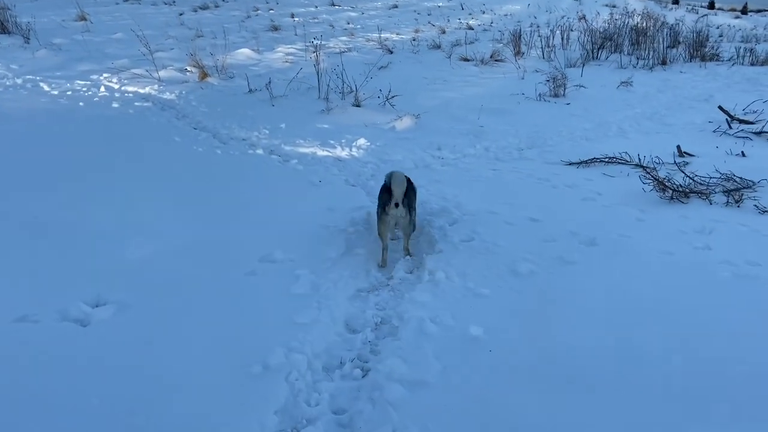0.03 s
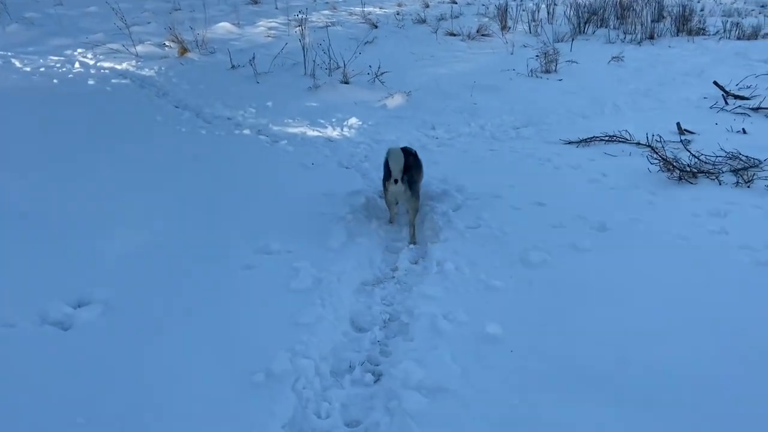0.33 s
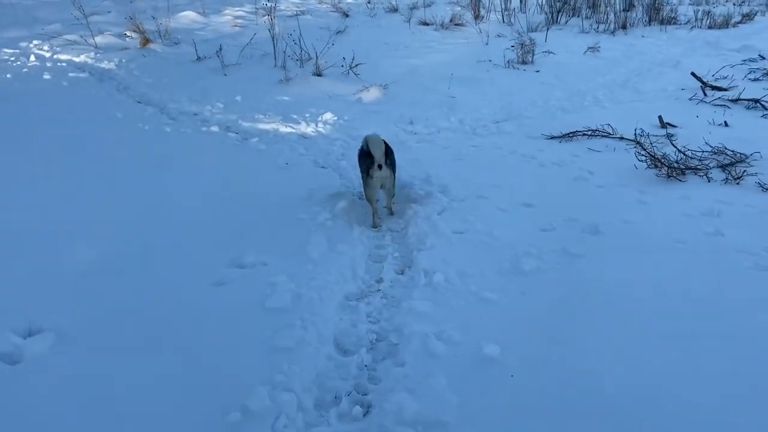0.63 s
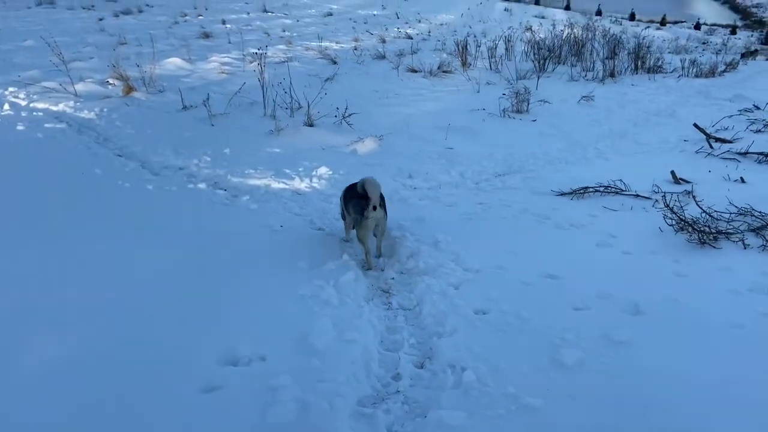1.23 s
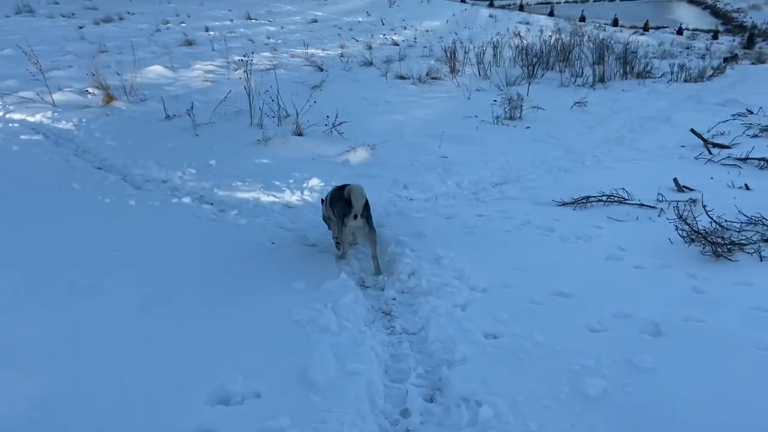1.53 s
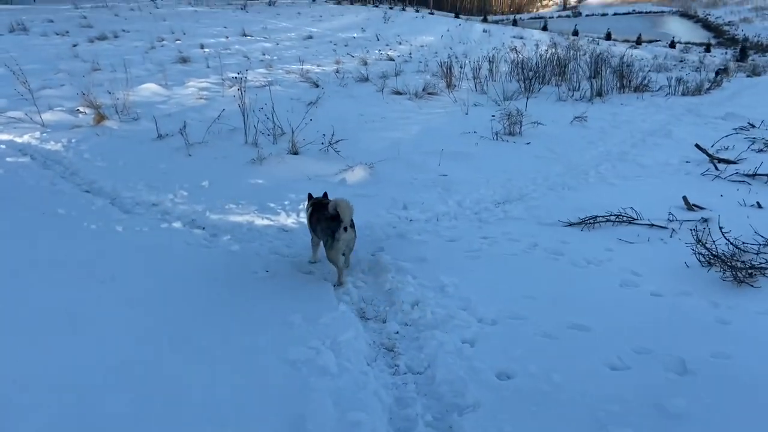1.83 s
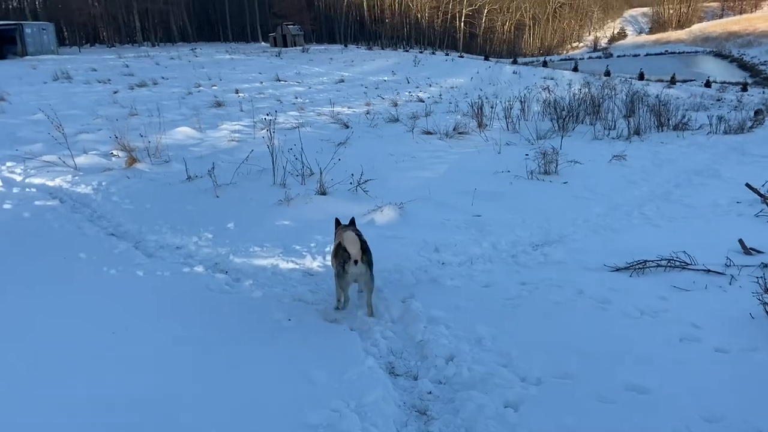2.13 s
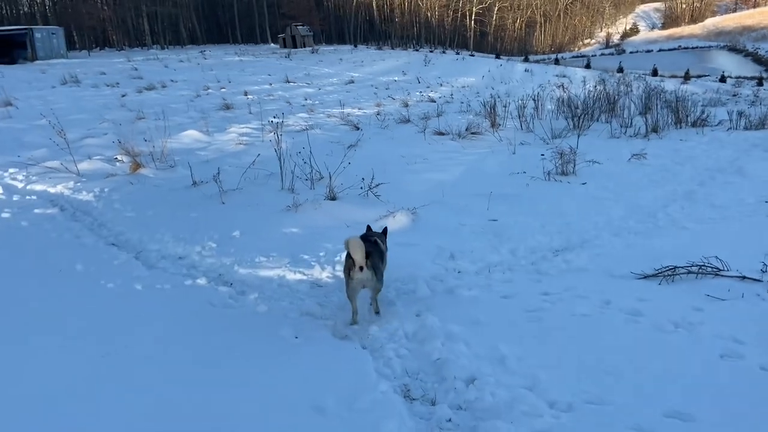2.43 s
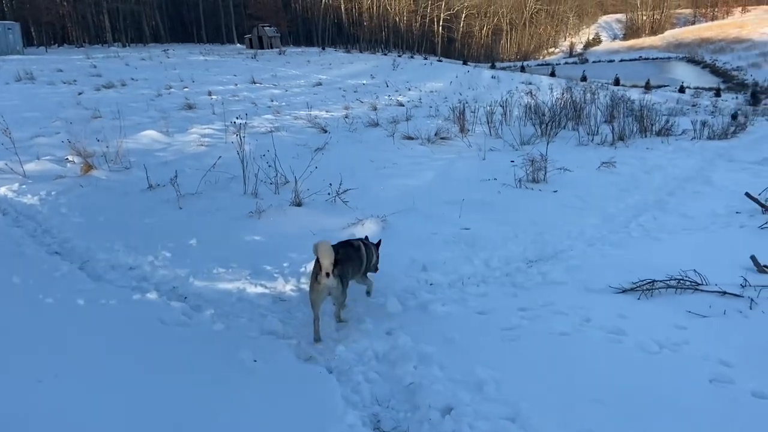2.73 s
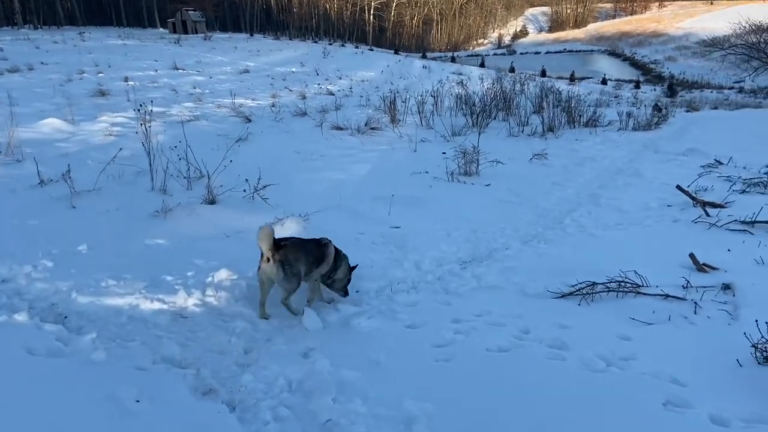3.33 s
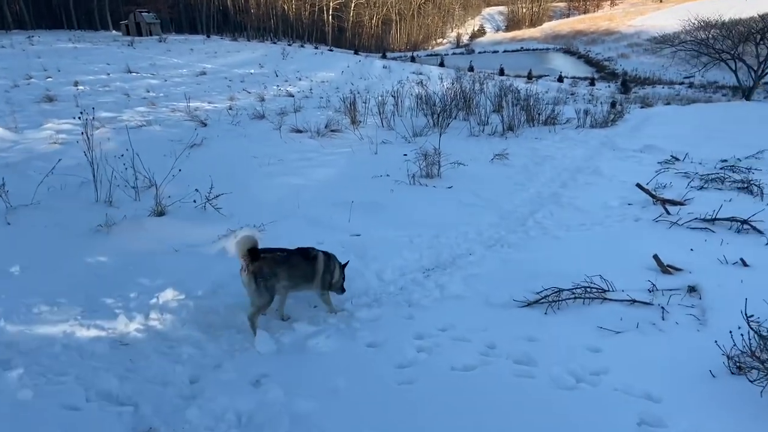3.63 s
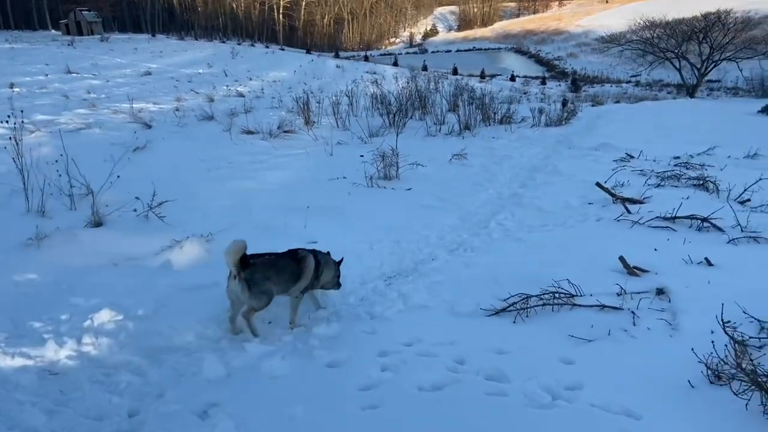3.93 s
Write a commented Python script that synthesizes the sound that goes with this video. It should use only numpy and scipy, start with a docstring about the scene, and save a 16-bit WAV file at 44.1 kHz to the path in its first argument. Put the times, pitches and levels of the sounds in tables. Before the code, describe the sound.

Footsteps crunch steadily through crusted snow, close by, over a light wind rumble.

```python
"""Footsteps crunch through crusted snow, about one every 0.6 s, close to a hand-held phone in an open field.
Each push of a boot packs the snow (low knocks), breaks the crust (crackle) and sprays icy powder (hiss),
all in small jerks. Plates of crust snap under and between the steps, slabs cave in, ice ticks and
skitters, and the snowpack groans under the weight. Light wind rumbles on the microphone. No echo."""
import sys
import numpy as np
from scipy import signal
from scipy.fft import rfft, irfft
from scipy.io import wavfile
from scipy.ndimage import uniform_filter1d

SR = 44100
rng = np.random.default_rng(int(sys.argv[2]) if len(sys.argv) > 2 else 0)


def unload_wav(signal):
    """Save mono or channel-first audio to the path in sys.argv[1] as 16-bit WAV at rate SR, clipped to [-1, 1]."""
    wavfile.write(
        sys.argv[1],
        SR,
        np.round(np.clip(np.atleast_2d(signal).T, -1, 1) * 32767).astype(np.int16),
    )


N = 176400

PACKING, CRUST, POWDER, GROAN = range(4)  # the layers, in the order of their level columns
# A boot pushing or dragging through snow. Each row: start, rise and hold in seconds, seconds to fall
# 20 dB, then packing, crust, powder and groan levels in dB before trim.
BOOT_PUSHES = [ (-.02, .02, .06, .04, -37, -52, -58, -42), (.075, .02, .14, .17, -33.5, -39.5, -51, -35),
               (.545, .01, .035, .05, -34, -46, -56, -32), (.598, .015, .06, .09, -36, -39, -44, -33),
               (.708, .02, .065, .09, -33.5, -39.5, -48, -33), (.950, .008, .02, .12, -48, -62, -65, -42),
               (1.160, .01, .08, .05, -44, -55, -64, -48), (1.266, .002, .035, .19, -33, -35, -51, -39),
               (1.325, .05, .035, .1, -32, -39, -49, -41), (1.480, .01, .14, .05, -41, -59, -68, -45),
               (1.655, .01, .08, .05, -45, -53, -58, -49), (1.795, .004, .045, .1, -42, -48, -54, -42),
               (1.850, .02, .035, .05, -39, -43, -50, -42), (1.915, .015, .02, .08, -33, -34, -40, -37),
               (1.950, .02, .09, .1, -38, -37.5, -44, -41), (2.115, .025, .05, .14, -35, -46, -56, -39),
               (2.385, .04, .08, .1, -41, -50, -57, -43), (2.490, .04, .17, .09, -38.5, -41.5, -51, -41),
               (2.790, .02, .2, .05, -50, -58, -64, -50), (3.025, .03, .05, .1, -43, -46, -54, -42),
               (3.075, .05, .08, .15, -36.5, -44.5, -48, -35), (3.230, .05, .09, .11, -32, -39.5, -53, -36),
               (3.683, .01, .04, .03, -43, -56, -69, -47), (3.735, .012, .008, .05, -35, -35, -44, -40),
               (3.765, .02, .13, .05, -39, -44, -52, -43), (3.890, .04, .1, .1, -33, -42, -47, -36)]
# Snow settling under the standing foot: packing, crust, powder and groan levels in dB before trim.
SETTLING_DB = (-56, -68, -78, -60)
# Plates of crust snapping. Each row: time in seconds, then packing, crust and powder targets in dB.
CRUST_SNAPS = [(.049, -33, -36, -48), (.079, -29, -31, -47), (.106, -32, -36, -47), (.117, -29, -33, -47),
               (.143, -29, -37, -50), (.187, -24, -31, -45), (.198, -27, -36, -47), (.213, -26, -33, -47),
               (.234, -29, -37, -49), (.274, -29, -41, -53), (.304, -36, -44, -54), (.329, -36, -41, -50),
               (.357, -32, -40, -48), (.385, -37, -47, -55), (.404, -35, -50, -60), (.429, -36, -48, -57),
               (.457, -33, -46, -57), (.553, -32, -39, -48), (.569, -32, -39, -43), (.623, -28, -34, -41),
               (.662, -29, -34, -42), (.732, -26, -35, -44), (.747, -29, -35, -45), (.756, -28, -36, -43),
               (.779, -29, -36, -46), (.811, -29, -35, -44), (.839, -33, -39, -45), (.846, -31, -35, -45),
               (.877, -31, -38, -52), (1.028, -44, -51, -59), (1.125, -38, -37, -49),
               (1.173, -32, -39, -48), (1.233, -38, -51, -56), (1.267, -31, -28, -43),
               (1.291, -26, -31, -46), (1.354, -29, -35, -47), (1.387, -27, -34, -46),
               (1.399, -25, -33, -45), (1.408, -27, -30, -42), (1.455, -33, -37, -49),
               (1.487, -34, -39, -50), (1.516, -35, -46, -52), (1.564, -34, -47, -55),
               (1.592, -33, -44, -53), (1.629, -32, -48, -57), (1.662, -34, -35, -47),
               (1.694, -35, -38, -45), (1.74, -36, -45, -55), (1.786, -36, -38, -47), (1.82, -37, -35, -38),
               (1.887, -32, -35, -43), (1.933, -29, -26, -33), (2.056, -30, -35, -43),
               (2.138, -30, -43, -53), (2.176, -29, -40, -50), (2.309, -40, -53, -58),
               (2.358, -36, -48, -51), (2.379, -39, -48, -56), (2.403, -34, -39, -51),
               (2.434, -30, -39, -51), (2.464, -32, -43, -52), (2.54, -32, -35, -48), (2.57, -33, -35, -47),
               (2.618, -31, -35, -46), (2.642, -33, -33, -47), (2.68, -34, -36, -44),
               (2.722, -35, -36, -47), (2.745, -33, -32, -42), (2.756, -32, -34, -45),
               (2.794, -37, -47, -53), (2.824, -35, -45, -51), (2.861, -38, -47, -55),
               (2.897, -42, -39, -50), (2.938, -40, -48, -54), (2.978, -38, -46, -55),
               (3.002, -37, -43, -51), (3.056, -36, -34, -49), (3.227, -30, -38, -49),
               (3.281, -25, -30, -49), (3.298, -28, -33, -48), (3.308, -28, -37, -49),
               (3.404, -33, -36, -54), (3.439, -32, -36, -52), (3.746, -32, -27, -40),
               (3.769, -36, -34, -45), (3.88, -29, -38, -48), (3.944, -30, -36, -43),
               (3.968, -30, -37, -43), (3.988, -23, -35, -45)]
# Allowance for the quiet bed, taken out of each snap's target: packing, crust and powder in dB.
SNAP_BED_DB = (-40, -58, -70)
# The tone of each snow layer. Each row: frequency in Hz, relative gain in dB.
PACKING_EQ = [(60, -13), (120, -7), (190, 1), (260, -.5), (330, 1), (450, .5), (650, .3), (900, -8),
              (1400, -21), (3000, -45), (16000, -70)]
CRUST_EQ = [(100, -35), (500, -12), (900, -.5), (1200, -.5), (1600, -4), (2100, -2), (3000, -8.5),
            (4200, -17), (6000, -30), (16000, -45)]
POWDER_EQ = [(200, -35), (1500, -13), (3000, -1), (4300, 3), (5600, -2), (7500, -2.5), (9000, -5.5),
             (11500, -4), (13500, -8.5), (16000, -8)]
GROAN_EQ = [(40, -25), (85, -2), (125, -5), (185, 1), (240, -1), (330, -7), (500, -22), (2000, -60)]
# The feel of each grain layer. Each lists: grains per second, size scatter, push trim and snap trim in dB,
# snap rise and decay in seconds, stereo width from 0 to 1, left minus right in dB.
PACKING_TEXTURE = (1100, 2.8, .4, -1.3, .001, .003, .22, .6)
CRUST_TEXTURE = (2400, 3.3, .1, -3.2, .0012, .0027, .24, -1.1)
POWDER_TEXTURE = (5500, 3.6, 1.8, .4, .002, .0028, .38, .8)
# The hollow under the sole ringing. Each row: start and length in seconds, first and last pitch in Hz,
# level in dB.
SOLE_HOLLOWS = [(.1, .06, 950, 700, -37), (.178, .07, 440, 560, -31), (.61, .07, 400, 340, -39),
                (.725, .11, 360, 260, -33), (1.28, .095, 600, 500, -31), (1.38, .055, 700, 470, -29),
                (1.89, .17, 800, 600, -39), (2.14, .06, 600, 480, -39), (2.52, .2, 850, 620, -42),
                (3.27, .11, 640, 440, -33), (3.93, .09, 460, 380, -35)]
# Slabs caving in, thin ice ticking, body weight landing. Each row: start in seconds, pitch in Hz, peak in dB.
SLAB_KNOCKS = [(.118, 900, -26), (.188, 580, -20), (.213, 600, -24), (.878, 950, -25), (1.267, 950, -19),
               (1.271, 800, -23), (1.292, 800, -17), (1.387, 720, -20), (1.399, 650, -18),
               (1.888, 950, -24), (1.934, 850, -22), (2.619, 800, -24), (3.282, 750, -18)]
ICE_TICKS = [(.08, 2300, -28), (.812, 2200, -29), (.841, 2200, -30), (1.124, 1100, -33), (1.266, 3000, -26),
             (1.27, 2200, -26), (1.409, 2100, -25), (1.663, 3100, -30), (1.665, 2000, -32),
             (1.695, 3200, -34), (1.697, 1050, -32), (1.82, 2200, -25), (1.93, 2100, -23),
             (1.935, 4900, -26), (2.406, 1450, -32), (2.745, 1900, -25), (2.756, 1300, -27),
             (2.897, 1050, -31), (3.057, 2200, -28)]
WEIGHT_BUMPS = [(.255, 52, -29), (.565, 55, -28), (.72, 90, -31), (.89, 46, -35), (1.53, 50, -30),
                (1.805, 90, -30), (1.928, 106, -23.5), (2.13, 52, -30), (2.21, 64, -30), (3.06, 55, -30),
                (3.24, 63, -27), (3.42, 62, -31), (3.83, 66, -32)]
# Loose ice on the crust. Each row: start and length in seconds, centre pitch in Hz, relative level in dB.
CHIP_SKITTERS = [(.955, .03, 4800, -62), (1.058, .004, 3700, -53), (1.067, .01, 4400, -51),
                 (1.71, .02, 4900, -50), (1.865, .025, 4000, -45), (1.925, .015, 4400, -40),
                 (1.97, .11, 3700, -45), (3.12, .07, 4900, -48)]
# The tone of wind on the microphone. Each row: frequency in Hz, relative gain in dB.
WIND_EQ = [(20, -48), (30, -38), (38, 7), (51, -5), (64, 1), (80, -4), (125, -12), (185, -4.5),
           (250, -14.5), (330, -8.5), (450, -19.5), (700, -34), (1500, -44), (4000, -54), (16000, -63)]
# The stereo width of the wind. Each row: frequency in Hz, side minus mid in dB.
WIND_WIDTH = [(30, -9), (60, -6), (120, -1), (200, -1), (380, -4), (1000, -4), (8000, -1)]
# How far the left microphone port leads the right. Each row: frequency in Hz, phase in half turns.
PORT_LEAD = [(0, 0), (4600, .2), (5400, .7), (6100, .05), (8100, 0), (8600, 1), (9400, 1), (9800, 0),
             (12200, 0), (12700, 1), (13900, 1), (14400, 0), (22050, 0)]


def snow_crunch(layer, eq, texture, slips):
    """One layer of crunch: grains give way under the boot, and snaps click and crumble over them."""
    rate, scatter_db, push_trim_db, snap_trim_db, rise_s, decay_s, width, pan_db = texture
    push = boot_pressure(layer) * undb(push_trim_db)
    clicks = crust_snaps(layer, push) * undb(snap_trim_db)
    click_gain, crumble_gain = .18, .88
    envelope = np.sqrt((push * slips) ** 2 + crumble_gain ** 2 * crumbling(clicks, rise_s, decay_s))
    mid = envelope * crackle(rate, scatter_db) + click_gain * clicks
    side = width * envelope * crackle(rate, scatter_db)
    balance = undb(np.array([[pan_db], [-pan_db]]) / 2)
    return stereo(colour(mid, eq), colour(side, eq)) * balance


def boot_pressure(layer):
    """One layer's envelope: each push rises, holds and falls back to the settling snow."""
    t = np.linspace(0, N / SR, N // 20)
    power = undb(SETTLING_DB[layer]) ** 2
    for start, rise, hold, fall, *db in BOOT_PUSHES:
        attack = np.clip((t - start) / rise, 0, 1)
        release = 10 ** (-np.maximum(t - start - rise - hold, 0) / fall)
        power = power + (undb(db[layer]) * attack * release) ** 2
    return np.interp(np.arange(N) / SR, t, np.sqrt(power))


def jerks(per_s=130, decay_s=.0018, smooth_share=.5):
    """Snow gives way in sudden slips on top of a smooth yield; rms 1."""
    kicks = grains(per_s, scatter_db=2.2) ** 2
    pole = np.exp(-1 / (decay_s * SR))
    slips = signal.lfilter([(1 - pole) ** 2], [1, -2 * pole, pole ** 2], kicks)  # quick swell, short tail
    return np.sqrt(smooth_share + (1 - smooth_share) * slips / slips.mean())


def crackle(rate, scatter_db, even_s=.012):
    """A dense crackle of uneven grains, kept at an even loudness."""
    clicks = grains(rate, scatter_db)
    local_power = np.abs(uniform_filter1d(clicks ** 2, int(even_s * SR)))
    return clicks / np.sqrt(local_power + 1e-3)


def crust_snaps(layer, push, length_s=.01, delay_s=.0013):
    """One click for each plate that snaps, sized by how far the push falls short of its target."""
    clicks = np.zeros(N)
    for start, *db in CRUST_SNAPS:
        i = min(int((start + delay_s) * SR), N - 1)
        target = undb(db[layer]) ** 2
        shortfall = target - push[i] ** 2 - undb(SNAP_BED_DB[layer]) ** 2
        clicks[i] += np.sqrt(max(shortfall, target / 10) * length_s * SR)
    return clicks


def crumbling(clicks, rise_s, decay_s):
    """Power of the small cracks that lead up to each snap and trail after it."""
    t = np.arange(-SR // 20, SR // 20 + 1) / SR
    shape = np.exp(np.minimum(t / rise_s, -t / decay_s))
    return np.abs(signal.oaconvolve(clicks ** 2, shape / shape.sum(), "same"))


def sole_hollows(grains_per_s=450, decay_cycles=1.5, scatter_db=2.5, fade_s=.01):
    """Grains ring the hollow under the sole; its pitch slides, mostly down, as the boot sinks."""
    out, age = np.zeros(N + SR), np.arange(SR // 40) / SR
    for start, length, first_hz, last_hz, db in SOLE_HOLLOWS:
        t = np.arange(int(length * SR)) / SR
        count = int(length * grains_per_s) + 1
        crunch = np.zeros(len(t) + len(age))
        for when, size in zip(rng.random(count), rng.standard_normal(count)):
            cycles = first_hz * (last_hz / first_hz) ** when * age
            ring = np.sin(2 * np.pi * cycles) * np.exp(-cycles / decay_cycles)
            i = int(when * len(t))
            crunch[i:i + len(age)] += np.sign(size) * undb(scatter_db * abs(size)) * ring
        fades = np.clip(np.minimum(t, length - t) / fade_s, 0, 1)
        i = int(start * SR)
        out[i:i + len(t)] += undb(db) * unit(crunch[:len(t)]) * fades
    return out[:N]


def caving_slabs():
    """A whole slab caves in with a hollow knock."""
    return knocks(SLAB_KNOCKS, rise_s=.0011)


def ticking_ice():
    """Thin plates of ice tick, each with a note of its own."""
    return knocks(ICE_TICKS, rise_s=.0008)


def body_weight():
    """The walker's weight lands in dull, low bumps."""
    return knocks(WEIGHT_BUMPS, rise_s=.026)


def snowpack_groan(width=.65):
    """The snowpack groans, deep and wide, under each push."""
    load = boot_pressure(GROAN)
    mid, side = (colour(load * rng.standard_normal(N), GROAN_EQ) for _ in range(2))
    return stereo(mid, width * side)


def skittering_chips(per_s=700, decay_s=.0014, spread_octaves=.35):
    """Ice chips skitter over the crust: tiny rings, each with its own pitch and pan."""
    out, age = np.zeros((2, N)), np.arange(SR // 80) / SR
    for start, length, centre_hz, db in CHIP_SKITTERS:
        for when, pitch, pan in rng.random((int(length * per_s) + 1, 3)):
            hz = centre_hz * 2 ** (spread_octaves * (2 * pitch - 1))
            ring = np.sin(2 * np.pi * hz * age) * np.exp(-age / decay_s)
            i = int((start + when * length) * SR)
            out[:, i:i + len(age)] += 2 * undb(db) * ring * np.array([[.5 + pan], [1.5 - pan]])
    return out


def wind(level_db=-34.9, flutter_db=1.4, flutter_hz=18):
    """Wind on the microphone: a low, fluttering rumble, partly different at the two ports."""
    lowpass = 1 / (1 + (np.fft.rfftfreq(N, 1 / SR) / flutter_hz) ** 2) ** 2
    flutter = unit(irfft(rfft(rng.standard_normal(N)) * lowpass, N))
    envelope = undb(level_db + flutter_db * flutter)
    mid, side = (colour(envelope * rng.standard_normal(N), WIND_EQ) for _ in range(2))
    return stereo(mid, irfft(rfft(side) * gains(WIND_WIDTH), N))


def grains(rate, scatter_db):
    """Random clicks of scattered size and either sign; rms 1."""
    hits = rng.random(N) < rate / SR
    sizes = undb(scatter_db * np.clip(rng.standard_normal(N), -2, 2))
    return unit(hits * sizes * rng.choice([-1, 1], N))


def knocks(table, rise_s):
    """One sine burst per row: a few cycles that swell and die away."""
    out, age = np.zeros(N + SR // 2), np.arange(SR // 2) / SR
    swell = (age / rise_s * np.exp(1 - age / rise_s)) ** 2
    for (start, hz, db), phase in zip(table, rng.random(len(table))):
        i = int(start * SR)
        out[i:i + len(age)] += undb(db) * swell * np.sin(2 * np.pi * (hz * age + phase))
    return out[:N]


def colour(x, eq, size=4096):
    """Minimum-phase EQ that keeps the power of white noise."""
    cepstrum = irfft(np.log(unit(gains(eq, size=2 * size))))
    cepstrum[1:size] *= 2
    cepstrum[size:] = 0
    impulse = irfft(np.exp(rfft(cepstrum)))
    return signal.oaconvolve(x, impulse)[:N]


def gains(points, size=N):
    """Gain at every FFT bin from (Hz, dB) points."""
    hz, db = np.array(points).T
    return undb(np.interp(np.log(np.fft.rfftfreq(size, 1 / SR) + 1), np.log(hz), db))


def stereo(mid, side):
    return np.array([mid + side, mid - side])


def undb(db):
    return 10 ** (np.asarray(db) / 20)


def unit(x):
    """Scale to rms 1."""
    return x / np.sqrt(np.mean(x ** 2))


def scene():
    """Three crunch layers move with the same jerks; groan, weight, wind and ice details join them."""
    slips = jerks()
    packing = snow_crunch(PACKING, PACKING_EQ, PACKING_TEXTURE, slips)
    crust = snow_crunch(CRUST, CRUST_EQ, CRUST_TEXTURE, slips)
    powder = snow_crunch(POWDER, POWDER_EQ, POWDER_TEXTURE, slips)
    steps = packing + crust + powder + sole_hollows() + snowpack_groan()
    return steps + skittering_chips() + body_weight() + wind() + caving_slabs() + ticking_ice()


def record(dry):
    """The phone's two ports differ in phase through the treble, and the very top is cut."""
    hz, half_turns = np.array(PORT_LEAD).T
    lead = np.pi * np.interp(np.fft.rfftfreq(2 * N, 1 / SR), hz, half_turns)
    ports = irfft(rfft(dry, 2 * N) * np.exp(.5j * np.array([lead, -lead])))[:, :N]
    high_cut = signal.ellip(10, .2, 80, 15900, fs=SR, output="sos")  # steep, at 15.9 kHz
    return signal.sosfilt(high_cut, ports)


dry = scene()
out = record(dry)
unload_wav(out)
```